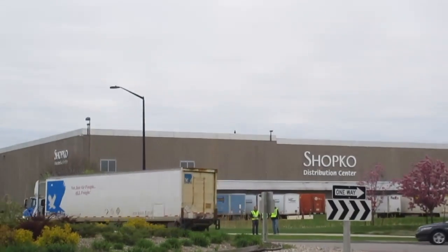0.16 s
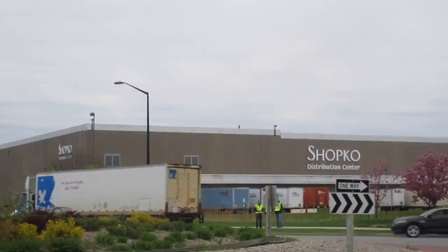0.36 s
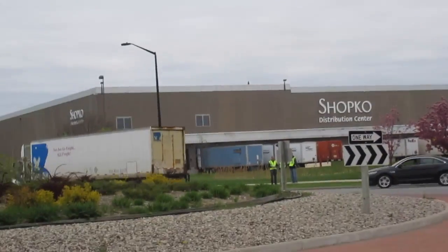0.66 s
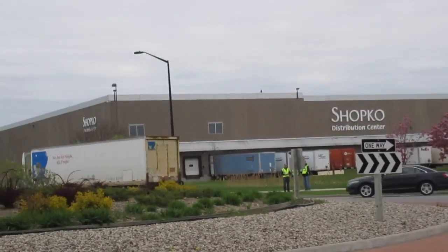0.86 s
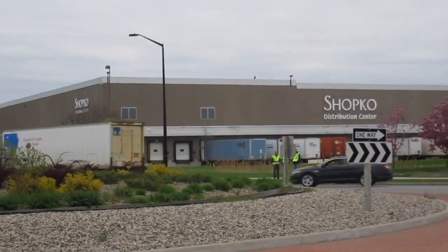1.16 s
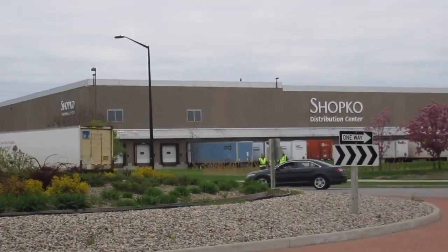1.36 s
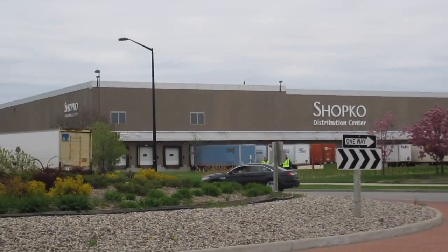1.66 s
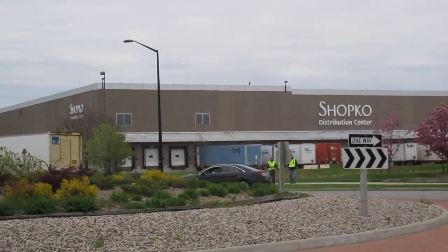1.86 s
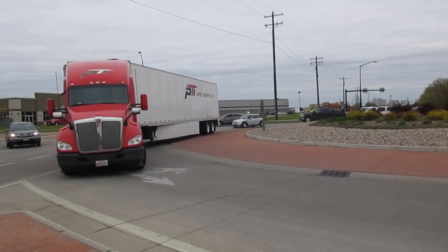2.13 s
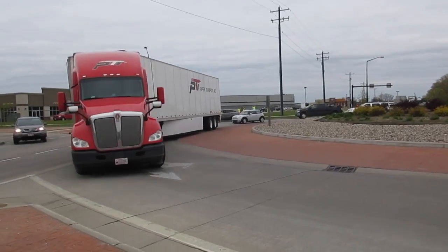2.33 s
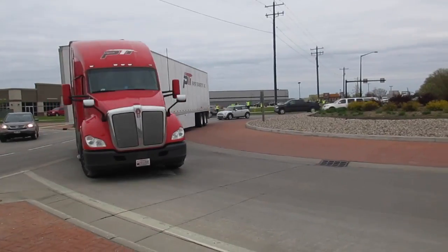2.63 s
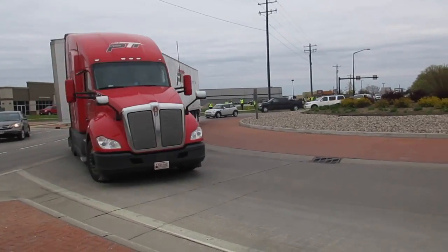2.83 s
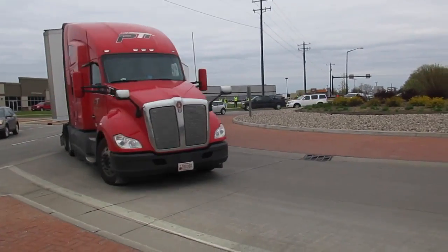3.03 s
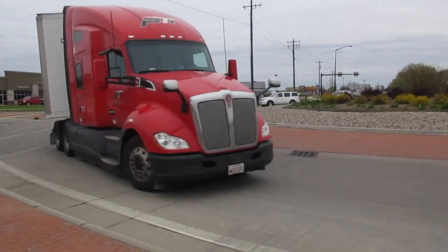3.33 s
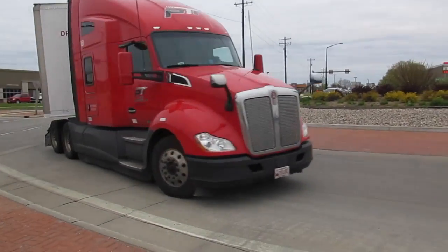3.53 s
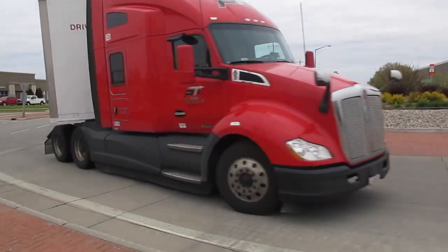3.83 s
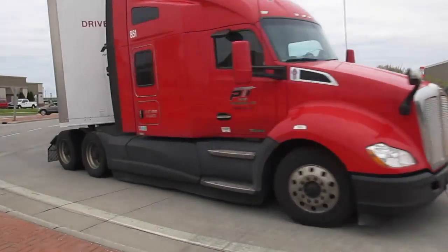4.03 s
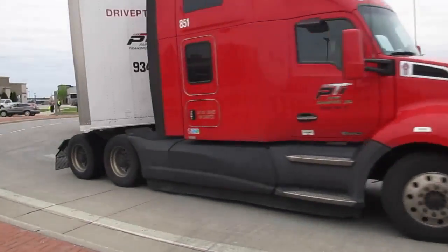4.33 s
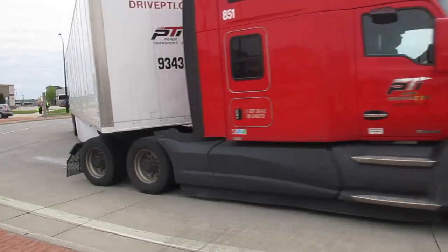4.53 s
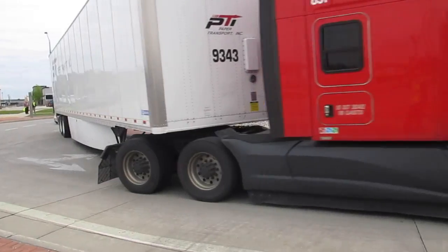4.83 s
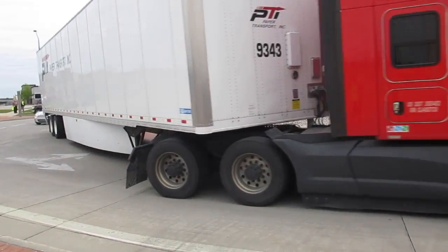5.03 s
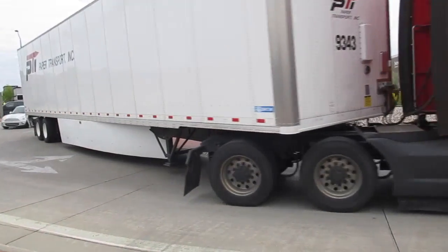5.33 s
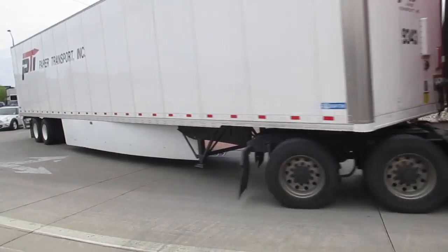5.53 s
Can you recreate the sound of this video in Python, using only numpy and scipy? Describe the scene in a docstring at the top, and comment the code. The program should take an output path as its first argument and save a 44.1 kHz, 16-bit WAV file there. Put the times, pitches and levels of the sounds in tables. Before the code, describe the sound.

Roadside, outdoors, dry and close. From 0 to 1.9 s a distant diesel truck rumbles in soft puffs, revving slightly until about 1 s and then easing off, while a car's tyre roar slowly grows. Bright tiny ticks fall mostly around 0.5 s; hollow rattles come near 0.2 and 1.3 s, with dull thumps clustered at 1.6 to 1.9 s. Complete silence from 1.9 to 2.1 s. A second diesel then enters, swelling to full by 3 s: low exhaust drone, throbbing rumble, fan roar, metallic clatter. A thin gear whine wavers downward until 4 s. A jolt at 3.7 s leaves a short low hum. From about 4 s tyre and side noise take over, with rough gearbox tones and an under-cab growl around 4.5 s, faint grit, and fluttering turbo hiss with a thin sinking whistle. The engine keeps slowing; the heaviest thud hits at 5.2 s, and the slightly softer roar continues to the end.

```python
"""Trucks at a roundabout

A distant diesel truck revs and eases off (crankshaft orders, puffed rumble) while a car rolls by (tyre noise).
After a moment of silence a second truck passes slowly at arm's length: exhaust drone from firing harmonics,
clatter and roar from noise pulsed by the firings, whining gears as wandering tones, turbo hiss as smeared tones.
Damped modes and ringing noise make the dull bumps of running gear, one with a low hum ringing on after it;
filtered grains make grit under the tyres.
"""
import sys
import numpy as np
from scipy import signal
from scipy.fft import rfft, irfft, next_fast_len
from scipy.io import wavfile
from scipy.ndimage import uniform_filter1d, map_coordinates

SR = 44100
rng = np.random.default_rng(int(sys.argv[2]) if len(sys.argv) > 2 else 0)


def to_wav(s):
    """Save 16-bit WAV."""
    ch = np.atleast_2d(s).T  # columns
    pcm = np.round(np.clip(ch, -1, 1) * 32767)  # PCM
    wavfile.write(sys.argv[1], SR, pcm.astype(np.int16))


N = 250607


def amp(db):
    """Decibels to gain."""
    return 10 ** (np.asarray(db) / 20)


def unit(x):
    """x at rms 1."""
    return x / np.sqrt(np.mean(x ** 2) + 1e-20)


def curves(rows):
    """One value per sample for each column after the time."""
    s, *cols = np.transpose(rows)
    return [np.interp(np.arange(N) / SR, s, c) for c in cols]


def wobble(rate):
    """A smooth random curve, rate knots a second."""
    knots = rng.standard_normal(int(N * rate / SR) + 4)
    return map_coordinates(knots, [np.arange(N) * rate / SR])


def swell(peak_s, half_s):
    """Bell-shaped gain: 1 at its peak, a half at half_s to either side."""
    return 0.5 ** (((np.arange(N) / SR - peak_s) / half_s) ** 2)


def filtered(x, response):
    """x times a response of frequency."""
    m = next_fast_len(N + SR // 2)
    return irfft(rfft(x, m) * response(np.fft.rfftfreq(m, 1 / SR)), m)[:N]


def noise(spectrum, bursts=1):
    """Noise of rms 1, its level shaped by bursts, then coloured by the spectrum."""
    f, db = np.transpose(spectrum)

    def colour(hz):
        return amp(np.interp(np.log(hz + 1), np.log(f), db, left=-120, right=-120))

    return unit(filtered(rng.standard_normal(N) * bursts, colour))


def resonate(x, hz, q):
    """x through one causal resonance."""
    return signal.lfilter(*signal.iirpeak(hz, q, SR), x)


def turns(hz):
    """Cycles completed at a changing rate."""
    return np.cumsum(hz) / SR


def tone(hz, rough, width_hz):
    """A line of rms 1 on a pitch curve; the rough share is smeared over a width."""
    smear = wobble(width_hz) + 1j * wobble(width_hz)
    size = np.sqrt(1 - rough) + np.sqrt(rough / 2) * smear
    return unit(np.real(size * np.exp(2j * np.pi * turns(hz))))


def firings(firing_hz, decay, scatter_db):
    """One dying burst per firing; strength varies by cylinder (six) and by stroke."""
    phase = turns(firing_hz)
    stroke = phase.astype(int)
    size_db = rng.standard_normal(6)[stroke % 6] + rng.standard_normal(1024)[stroke]
    since_firing_s = (phase % 1) / firing_hz
    return unit(amp(scatter_db * size_db) * np.exp(-since_firing_s / decay))


def add(track, s, sound):
    """Mix a sound into the track at a time."""
    part = track[round(s * SR):][:len(sound)]
    part += sound[:len(part)]


# near engine slows: (time [s], firing rate [Hz])
ENGINE = [(2.11, 50.55), (2.6, 49.4), (3.08, 49.1), (3.5, 47.5), (3.95, 47.2), (4.5, 44.26), (5.68, 40.7)]
# truck draws up, stays level, drops behind the cab: (time [s], level [dB])
PASS = [(2.11, -11.5), (2.33, -9.5), (2.35, -7.5), (2.47, -5), (2.93, -0.6), (3.25, 0), (3.45, -1),
        (3.85, -1.2), (4.33, 0.24), (4.55, 0.1), (5.05, -0.5), (5.3, -3), (5.52, -1.7), (5.68, -2.5)]
# firing-rate harmonics 1, 2, 3: (peak time [s], half-width [s], level [dB], roughness [0-1], smear [Hz])
DRONE = [(3.1, 1.7, -46, 0.13, 22), (2.81, 1.06, -42.5, 0.43, 44), (3.4, 0.88, -48.5, 0.66, 24)]
DRONE_SWING_DB_PER_DB = 0.78  # share of PASS that it follows


def exhaust_drone():
    """Exhaust pulses at the firing rate sum to a few rough harmonics."""
    firing_hz, = curves(ENGINE)
    pass_db, = curves(PASS)
    drone = np.zeros(N)
    for k, (s, half_s, db, rough, smear_hz) in enumerate(DRONE, 1):
        level = amp(db + DRONE_SWING_DB_PER_DB * pass_db)
        drone += level * swell(s, half_s) * tone(k * firing_hz, rough, smear_hz)
    return -drone  # each stroke arrives as a trough of pressure


# (time [s], share of sound from the truck's side [0-1])
SIDE_ON = [(2.11, 0), (3.5, 0.04), (4.3, 0.8), (5.68, 0.89)]
# exhaust rumble spectrum: (frequency [Hz], relative density [dB/Hz])
RUMBLE = [(22, -30), (38, -9), (52, -3), (65, -7), (96, 2.5), (140, 1), (195, -3), (252, -2.5), (320, -4),
          (402, -9.5), (450, -16.5), (580, -31), (990, -120)]
RUMBLE_AHEAD_DB, RUMBLE_SIDE_DB, RUMBLE_SWING_DB_PER_DB = -41.5, -40, 0.79


def exhaust_rumble(knock):
    """Low turbulent exhaust noise, pushed by each firing."""
    share, = curves(SIDE_ON)
    pass_db, = curves(PASS)
    level_db = (1 - share) * RUMBLE_AHEAD_DB + share * RUMBLE_SIDE_DB
    level_db = level_db + RUMBLE_SWING_DB_PER_DB * pass_db + 0.32 * wobble(14)
    return amp(level_db) * noise(RUMBLE, 1 + 0.14 * knock)


# radiator fan, from ahead: (frequency [Hz], relative density [dB/Hz])
FAN = [(260, -14), (450, -3), (769, -0.5), (884, -2.5), (1130, -1.5), (1380, -7), (1510, -5.5),
       (1640, -10.5), (1950, -9), (2600, -17), (3380, -27), (5720, -120)]
# tyres and engine, from the side: (frequency [Hz], relative density [dB/Hz])
ROAR = [(260, -49), (450, -6.5), (586, -4), (674, -1.5), (804, -4.5), (987, 1), (1130, -1.5), (1380, -6),
        (2030, -3.5), (2600, -12.5), (3380, -52), (5720, -120)]
FAN_DB, ROAR_DB = -37.5, -38.5


def roar(throb):
    """Fan noise from ahead cross-fades to tyre and engine noise from the side."""
    share, = curves(SIDE_ON)
    pass_db, = curves(PASS)
    fan = amp(FAN_DB) * np.sqrt(1 - share) * noise(FAN, throb)
    side = amp(ROAR_DB) * np.sqrt(share) * noise(ROAR, throb)
    return amp(pass_db + 0.59 * wobble(30)) * (fan + side)


# engine block's ring: (frequency [Hz], relative density [dB/Hz])
BLOCK = [(1530, -7), (2600, -5), (3210, -1), (4460, -10), (5300, -8), (7000, -18), (9100, -64),
         (15400, -120)]
CLATTER_AHEAD_DB, CLATTER_SIDE_DB = -42.5, -45.5


def clatter(knock):
    """Each firing knocks the block, which rings as pulsed noise."""
    share, = curves(SIDE_ON)
    level_db = (1 - share) * CLATTER_AHEAD_DB + share * CLATTER_SIDE_DB
    level_db = level_db + curves(PASS)[0] + 1.16 * wobble(36)
    return amp(level_db) * noise(BLOCK, 1 + 0.15 * knock)


# hiss from ahead: (frequency [Hz], relative density [dB/Hz])
AIR = [(4120, -33), (7000, -1), (12500, -10.5), (13600, -11.5), (15000, -18)]
# hiss from the side: (frequency [Hz], relative density [dB/Hz])
TREAD = [(4120, -11), (7000, 0), (8160, -3), (10900, -10.5), (15000, -25)]
AIR_DB, AIR_SWING_DB_PER_DB = -57, 1.17
TREAD_S, TREAD_HALF_S, TREAD_DB = 3.6, 2.24, -53


def air(throb):
    """Hiss from ahead cross-fades to hiss from the tractor's side."""
    share, = curves(SIDE_ON)
    pass_db, = curves(PASS)
    ahead = amp(AIR_DB) * np.sqrt(1 - share) * noise(AIR, throb)
    side = amp(TREAD_DB) * swell(TREAD_S, TREAD_HALF_S) * np.sqrt(share) * noise(TREAD)
    return amp(AIR_SWING_DB_PER_DB * pass_db) * (ahead + side)


def near_truck():
    """One train of firings drives exhaust and block and lightly pulses roar and front hiss."""
    knock = firings(curves(ENGINE)[0], decay=0.0032, scatter_db=1.5)
    throb = 1 + 0.037 * knock
    return exhaust_drone() + exhaust_rumble(knock) + roar(throb) + clatter(knock) + air(throb)


# timing gear, swelling and fading as the truck turns: (time [s], pitch [Hz], level [dB])
WHINE = [(2.11, 1578, -66), (2.42, 1565, -53.5), (2.6, 1554, -52), (2.73, 1546, -58), (2.93, 1522, -50),
         (3.08, 1532, -47.5), (3.32, 1500, -53), (3.43, 1494, -45.5), (3.57, 1478, -66), (3.69, 1464, -46),
         (3.79, 1468, -54), (3.91, 1464, -47.5), (4.0, 1450, -70)]
WHINE_WANDER_HZ, WHINE_FLUTTER_DB = 2.98, 1
# first a low hum ringing on after the jolt at 3.7 s, then gearbox tones:
# (multiple of firing rate, peak time [s], half-width [s], level [dB], roughness [0-1], smear [Hz])
HUM_AND_GEARBOX = [(3, 3.77, .08, -41, 0.4, 24), (5.604, 4.26, 0.11, -43, 0.6, 27),
                   (5.604, 4.67, 0.087, -46, 0.4, 24), (7.01, 4.24, 0.37, -50, 0.6, 24)]
HUM_AND_GEARBOX_FLUTTER_DB, HUM_AND_GEARBOX_FLUTTER_PER_S = -1.2, 6.3


def whine_hum_and_gearbox():
    """Timing gear whines unsteadily; a low hum rings on after a jolt, then gearbox tones swell."""
    firing_hz, = curves(ENGINE)
    whine_hz, whine_db = curves(WHINE)
    level = amp(whine_db + WHINE_FLUTTER_DB * wobble(16))
    out = level * tone(whine_hz + WHINE_WANDER_HZ * wobble(14), rough=0.08, width_hz=30)
    for k, s, half_s, db, rough, smear_hz in HUM_AND_GEARBOX:
        level = amp(db + HUM_AND_GEARBOX_FLUTTER_DB * wobble(HUM_AND_GEARBOX_FLUTTER_PER_S))
        out += level * swell(s, half_s) * tone(k * firing_hz, rough, smear_hz)
    return out


# turbo hiss: (time [s], centre [Hz])
TURBO = [(2.11, 3404), (3, 3271), (3.85, 3053), (4.7, 3317), (5, 3457), (5.25, 3574), (5.42, 3700),
         (5.68, 3650)]
# swelling bands: (multiple of centre, peak time [s], half-width [s], level [dB], smear [Hz])
TURBO_BANDS = [(1, 3.48, 0.71, -51, 480), (1, 4.99, 0.2, -50.5, 520), (1, 5.22, 0.072, -49.5, 250),
               (1, 5.42, 0.06, -49.5, 450), (1, 4.8, .05, -53, 460), (1.76, 3.33, 0.47, -54, 760),
               (1.65, 4.86, .22, -54.5, 920), (2.02, 4.85, 0.25, -61, 500), (2.0, 5.38, 0.16, -64, 770)]
TURBO_FLUTTER_DB, TURBO_FLUTTER_PER_S, TURBO_WANDER_HZ = 2.5, 34, 30
WHISTLE_S, WHISTLE_HALF_S, WHISTLE_DB = 4.66, 0.26, -56.5
WHISTLE_HZ, WHISTLE_SAG_HZ_PER_S = 4210, 150  # pitch at WHISTLE_S, fall


def sputter():
    """Random level flutter of rms 1."""
    return unit(amp(TURBO_FLUTTER_DB * wobble(TURBO_FLUTTER_PER_S)))


def turbo():
    """Smeared tones on a wandering centre hiss in bands; a thin broken whistle sinks in pitch."""
    hiss_hz = curves(TURBO)[0] + TURBO_WANDER_HZ * wobble(18)
    out = np.zeros(N)
    for k, s, half_s, db, smear_hz in TURBO_BANDS:
        band = tone(k * hiss_hz, rough=0.98, width_hz=smear_hz)
        out += amp(db) * sputter() * swell(s, half_s) * band
    sag_hz = WHISTLE_SAG_HZ_PER_S * (np.arange(N) / SR - WHISTLE_S)
    whistle_hz = WHISTLE_HZ - sag_hz + TURBO_WANDER_HZ * wobble(18)
    whistle = tone(whistle_hz, rough=0.99, width_hz=150)
    return out + amp(WHISTLE_DB) * sputter() * swell(WHISTLE_S, WHISTLE_HALF_S) * whistle


# under-cab growl: (frequency [Hz], relative density [dB/Hz])
GROWL = [(100, -23), (145, -9), (215, -5), (270, 2), (330, -4), (420, -29), (560, -58)]
GROWL_S, GROWL_HALF_S, GROWL_DB = 4.55, 0.3, -47


def growl():
    """Low noise, lumpy with the firings, escapes from under the cab as it goes by."""
    firing_hz, = curves(ENGINE)
    lumps = 6 + 0.5 * firings(firing_hz, decay=0.0058, scatter_db=1)
    return amp(GROWL_DB) * swell(GROWL_S, GROWL_HALF_S) * noise(GROWL, lumps)


RATTLE_DB, RATTLE_MEDIAN_GAP_S, RATTLE_MEDIAN_HZ = -46.5, 1 / 130, 1000
RATTLE_T60_CYCLES = 16


def engine_rattle():
    """Valves, injectors and loose covers: damped sines, uneven in timing, pitch and strength."""
    out, t = np.zeros(N), np.arange(SR // 40) / SR
    draws = rng.standard_normal((1500, 3))
    times = np.cumsum(np.exp(0.6 * draws[:, 0])) * RATTLE_MEDIAN_GAP_S
    for s, (_, pitch, size) in zip(times, np.clip(draws, -2, 2)):
        hz = RATTLE_MEDIAN_HZ * np.exp(0.5 * pitch)
        level_db = 3.4 * size - 60 * t * hz / RATTLE_T60_CYCLES
        add(out, s, amp(level_db) * np.sin(2 * np.pi * hz * t))
    return amp(RATTLE_DB) * unit(out)


GRIT_DB, GRAINS_PER_S = -63, 70


def grit():
    """Sand cracks under the tyres: many faint grains and a few louder ones."""
    struck = rng.random(N) < GRAINS_PER_S / SR
    grains = struck * amp(3.5 * np.minimum(rng.exponential(size=N), 3))
    return amp(GRIT_DB) * unit(resonate(resonate(grains, 4500, q=0.7), 6000, q=0.78))


# running-gear jolts: (time [s], thud level [dB], rattle level [dB], rattle pitch [Hz])
BUMPS = [(.213, -50, -37.5, 776), (1.269, -37, -36.5, 950), (1.351, -41, -35, 816), (1.603, -41, -34, 950),
         (1.654, -34, -33.5, 850), (1.688, -30, -51, 900), (1.727, -45, -41.5, 820),
         (1.882, -28.5, -41, 850), (3.262, -45, -33.5, 780), (3.701, -30.5, -31.5, 1070),
         (4.497, -31, -47, 1000), (4.73, -36, -32, 1020), (5.05, -45, -32, 1000), (5.182, -20.5, -40, 600),
         (5.224, -28, -52, 703), (5.388, -32, -43, 1054), (5.492, -50, -35, 1523)]
THUD_HZ, THUD_RISE_S = (157, 240), 0.0029  # nominal panel modes, time to full swing


def bumps():
    """A jolt swings two low panel modes and rings the fittings in a short hollow rattle."""
    out, t = np.zeros(N), np.arange(SR // 5) / SR
    swing = t / THUD_RISE_S * np.exp(1 - t / THUD_RISE_S)
    fade = amp(-60 * t / 0.055) * (1 - np.exp(-t / 0.00056))
    for s, thud_db, rattle_db, hz in BUMPS:
        modes = sum(np.sin(2 * np.pi * mode_hz * rng.normal(1, 0.04) * t) for mode_hz in THUD_HZ)
        thud = swing * modes / 2
        ring = resonate(resonate(rng.standard_normal(len(t)), hz, q=5.1), 830, q=0.74)
        rattle = unit(ring * fade) * np.sqrt(np.mean(fade ** 2))
        add(out, s, amp(thud_db) * thud + amp(rattle_db) * rattle)
    return out


# close ticks: (time [s], level [dB], centre [Hz], Q of each resonance, t60 [s])
TICKS = [(.127, -48, 7250, 2.6, 0.041), (.342, -63, 10500, 2, .04), (.512, -39, 7400, 1.1, .005),
         (.53, -53, 8000, .9, .012), (.556, -49.5, 7000, 1.2, .016), (.592, -55, 11000, .75, .007)]


def ticks():
    """Tiny bright snaps: twice-resonated noise that dies at once."""
    out, t = np.zeros(N), np.arange(SR // 10) / SR
    for s, db, hz, q, t60 in TICKS:
        snap = resonate(resonate(rng.standard_normal(len(t)), hz, q), hz, q)
        add(out, s, amp(db) * unit(snap) * amp(-60 * t / t60))
    return out


# distant truck revs, then eases off: (time [s], crankshaft rate [Hz])
FAR_ENGINE = [(0, 33.88), (.55, 35.55), (1.04, 38.2), (1.45, 33.9), (1.92, 32.87)]
# orders: (multiple of crankshaft rate, peak time [s], half-width [s], level [dB], roughness [0-1])
FAR_ORDERS = [(2, 0.59, 0.67, -50.5, 0.3), (3, 0.057, 0.19, -44.5, 0.12), (3, 0.79, 0.32, -44.5, 0.18),
              (3, 1.5, 0.22, -52, 0.4), (4, 1.0, 0.42, -52.5, 0.3), (4.3, 1.666, 0.11, -45.5, 0.4),
              (5.5, 1.07, 0.12, -48, .35), (6.75, 0.14, 0.29, -49.5, .08), (8, 1.05, 0.28, -50.5, .15)]
FAR_WAVER_DB, FAR_WAVER_PER_S = 0.6, 19
# (frequency [Hz], relative density [dB/Hz])
FAR_RUMBLE = [(15, -54), (25, -21), (56, -5), (102, -2), (134, -5), (226, -4), (268, -8.5), (302, -8),
              (370, -10.5), (450, -15), (580, -45), (990, -120)]
FAR_RUMBLE_START_DB, FAR_RUMBLE_DB_PER_S = -43.5, 0.5  # grows as traffic draws nearer


def far_engine(crank_hz, puffs):
    """Crankshaft orders stand out in turn over a rumble puffed by the firings."""
    out = np.zeros(N)
    for k, s, half_s, db, rough in FAR_ORDERS:
        level = amp(db + FAR_WAVER_DB * wobble(FAR_WAVER_PER_S))
        out += level * swell(s, half_s) * tone(k * crank_hz, rough, width_hz=28)
    rumble_db = FAR_RUMBLE_START_DB + FAR_RUMBLE_DB_PER_S * np.arange(N) / SR
    return out + amp(rumble_db + 0.52 * wobble(12.9)) * noise(FAR_RUMBLE, puffs)


# car tyres: (frequency [Hz], relative density [dB/Hz])
FAR_TYRES = [(260, -28), (450, -7), (566, -6.5), (823, -3), (1140, -9), (1380, -8.5), (2030, -14.5),
             (3000, -23.5), (3900, -48.5), (6600, -120)]
FAR_TYRES_START_DB, FAR_TYRES_DB_PER_S = -45, 0.2


def far_tyres():
    """Tyre roar of a car: coloured noise that slowly grows."""
    level_db = FAR_TYRES_START_DB + FAR_TYRES_DB_PER_S * np.arange(N) / SR
    return amp(level_db + 0.25 * wobble(17.25)) * noise(FAR_TYRES)


# (frequency [Hz], relative density [dB/Hz])
FAR_HISS = [(1760, -14), (3000, -1.5), (4900, -6.5), (5960, -11.5), (9110, -18), (9880, -21.5),
            (13000, -29), (15000, -37)]
# (time [s], level [dB])
FAR_HISS_LEVEL = [(0, -54.5), (.6, -55), (1.25, -59.5), (1.9, -53.5)]


def far_hiss(puffs):
    """Distant treble noise, lightly pulsed by the firings."""
    level_db, = curves(FAR_HISS_LEVEL)
    return amp(level_db + 0.43 * wobble(27)) * noise(FAR_HISS, 1 + 0.3 * puffs)


def far_traffic():
    """Three firings per crankshaft turn puff the distant truck's noise, beside a car's tyres."""
    crank_hz, = curves(FAR_ENGINE)
    puffs = 0.5 + 0.24 * firings(3 * crank_hz, decay=0.0082, scatter_db=3.0)
    return far_engine(crank_hz, puffs) + far_tyres() + far_hiss(puffs)


# distant trailer's fittings: (peak time [s], half-width [s], level [dB], pitch [Hz])
FAR_SHAKES = [(.24, .06, -53, 800), (1.25, 0.079, -50.5, 920), (1.345, 0.023, -47, 780),
              (1.76, .16, -48, 760)]
SHAKE_SMEAR_HZ, SHAKE_JUDDER_DB, SHAKE_JUDDER_PER_S = 290, 2.5, 110


def far_shakes():
    """The distant trailer's fittings judder with a hollow, tinny ring: smeared tones, fluttering."""
    judder = unit(amp(SHAKE_JUDDER_DB * wobble(SHAKE_JUDDER_PER_S)))
    ring = np.zeros(N)
    for s, half_s, db, hz in FAR_SHAKES:
        ring += amp(db) * swell(s, half_s) * tone(np.full(N, hz), rough=1, width_hz=SHAKE_SMEAR_HZ)
    return judder * ring


# (start [s], end [s])
SILENCE = (1.914, 2.114)


def scene():
    """Distant traffic, then the close truck; bumps and ticks are added to both."""
    near = np.arange(N) / SR > np.mean(SILENCE)
    loose = amp(curves(PASS)[0]) * (grit() + engine_rattle())
    truck = near_truck() + loose + whine_hum_and_gearbox() + growl() + turbo()
    far = far_traffic() + far_shakes()
    return (np.where(near, truck, far) + bumps() + ticks())[None]


# brief level dips: (time [s], depth [dB], recovery time constant [s])
DIPS = [(3.721, -3, 0.076), (5.191, -3.5, 0.19)]
TOP_HZ = 15050


def record(dry):
    """The sound drops out once and dips twice; nothing is kept above the band limit."""
    t = np.arange(N) / SR
    sounding = (t < SILENCE[0]) | (t > SILENCE[1])
    live = uniform_filter1d(1.0 * sounding, size=32)  # softens the edges
    dip_db = sum(depth_db * (t > s) * np.exp(-np.abs(t - s) / recovery_s)
                 for s, depth_db, recovery_s in DIPS)
    return filtered(dry[0] * live * amp(dip_db), lambda hz: hz < TOP_HZ)[None]


dry = scene()
out = record(dry)
to_wav(out)
```